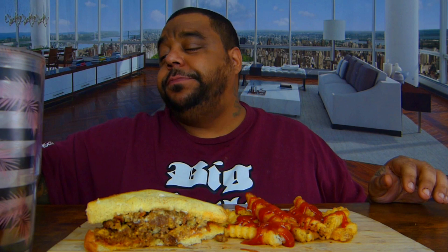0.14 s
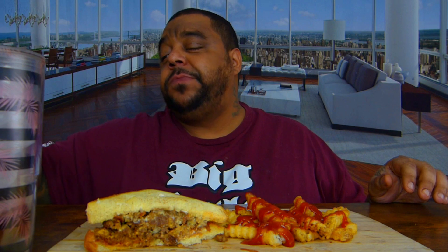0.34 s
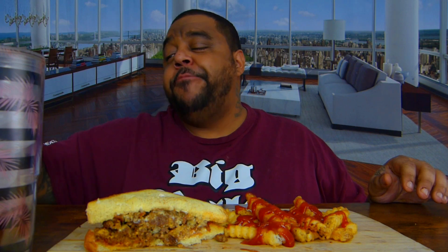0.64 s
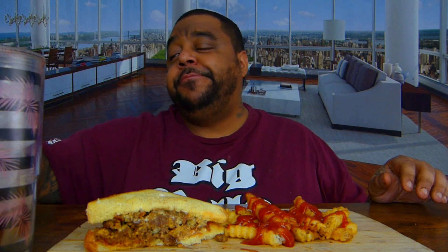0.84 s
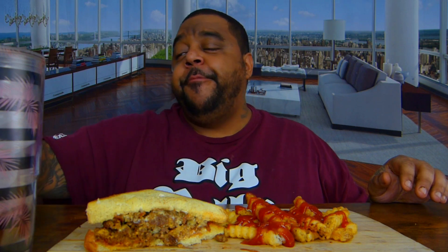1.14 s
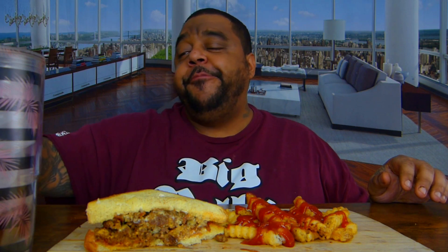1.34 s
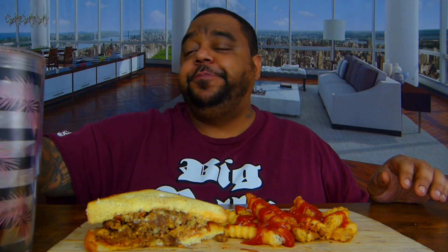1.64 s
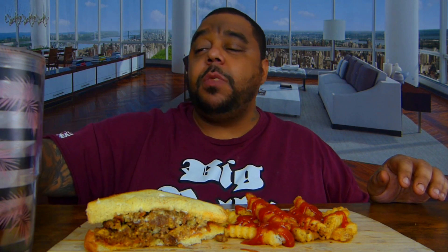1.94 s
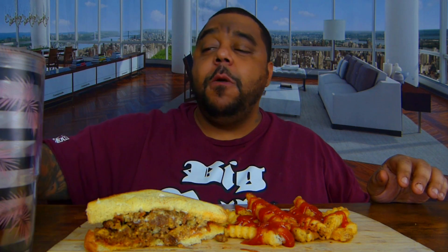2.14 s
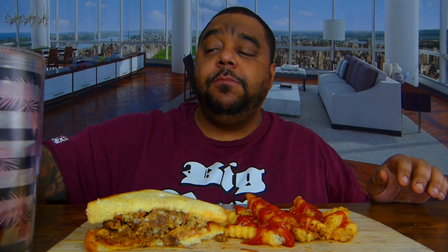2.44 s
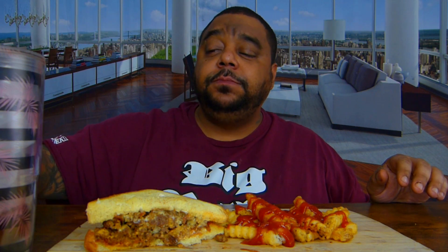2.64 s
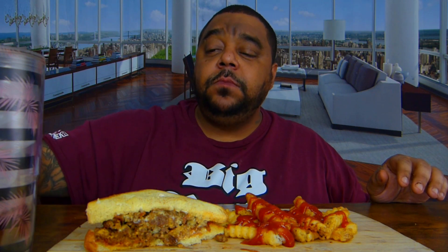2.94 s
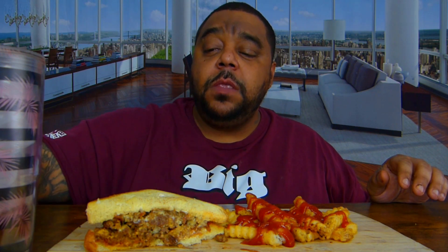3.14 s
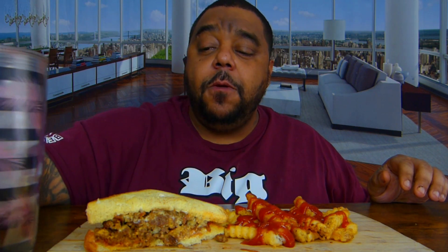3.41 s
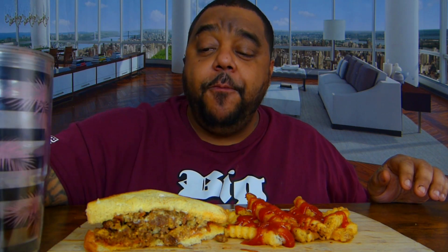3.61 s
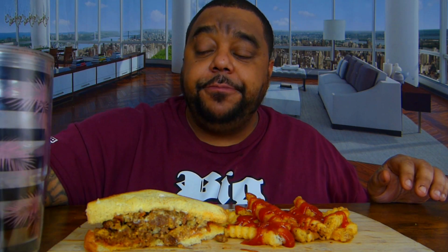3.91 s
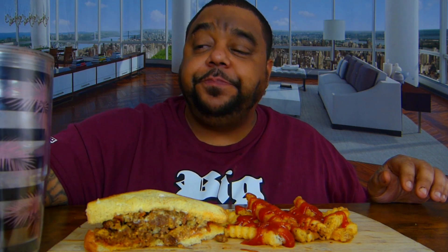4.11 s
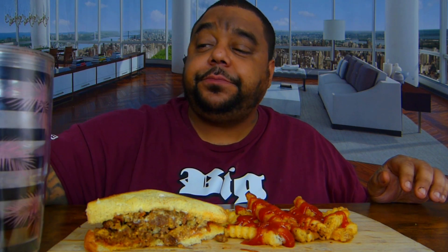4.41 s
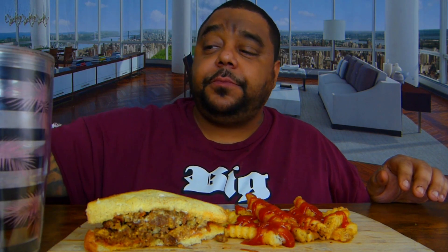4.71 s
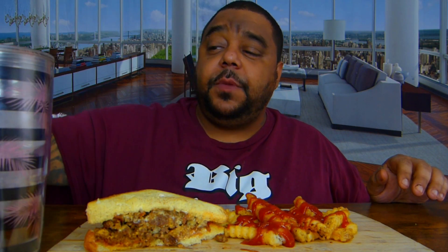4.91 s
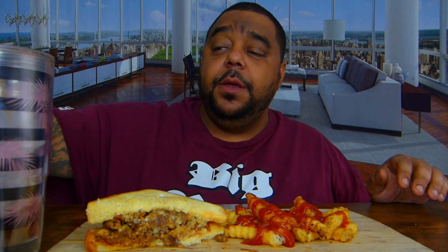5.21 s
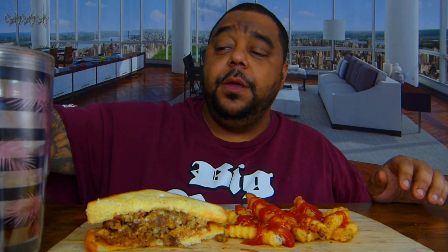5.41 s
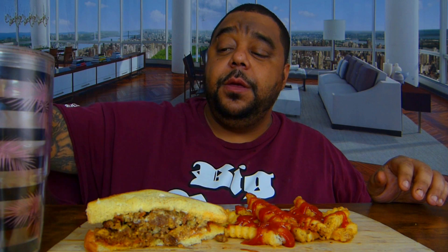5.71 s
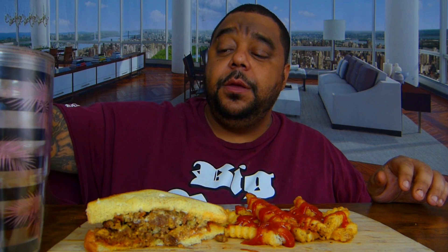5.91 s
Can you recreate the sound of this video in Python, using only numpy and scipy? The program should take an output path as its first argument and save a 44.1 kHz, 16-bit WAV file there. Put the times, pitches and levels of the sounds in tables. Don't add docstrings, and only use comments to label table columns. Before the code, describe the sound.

In a small quiet room, a full drink can is shifted lightly over a wooden table. A tiny tab tick leads to a loud metallic crack, a short burst of escaping gas and the lid tearing. The tab clicks back with a small squeak. A cup then scrapes hollowly over the wood and bumps to a stop. After a pause, soda drips, splashes and fizzes in it. The microphone is close, the can slightly to the left.

```python
import sys
import numpy as np
from scipy import signal
from scipy.fft import rfft, irfft, next_fast_len
from scipy.io import wavfile
from scipy.ndimage import uniform_filter1d, map_coordinates

SR = 44100
rng = np.random.default_rng(int(sys.argv[2]) if len(sys.argv) > 2 else 0)


def pcm_store(signal):
    levels = np.round(np.clip(np.atleast_2d(signal), -1, 1) * 32767)
    wavfile.write(sys.argv[1], SR, levels.astype(np.int16).T)


def nominal_scale(level):
    x = np.asarray(level, float) / 20
    return 10 ** x


N = 267246

# frequency in Hz, level in dB per Hz.
AIR = [(12, -35.5), (20, -14.5), (44, -32.5), (111, -15), (205, -13), (230, -14), (438, -19), (883, -14),
       (960, -18.5), (2290, -28), (3690, -43), (9060, -35.5), (12700, -42), (15000, -50), (16300, -65)]
# frequency in Hz, left-right likeness from -1 to 1.
ALIKE = [(60, 0.98), (180, 0.47), (550, -0.23), (1650, -0.31), (4970, 0.12), (15000, 0.42)]
# frequency in Hz, t60 in seconds.
ROOM_DECAY = [(200, 0.53), (1200, 0.19), (5000, 0.21), (12000, 0.17)]
# delay in seconds, level in dB.
ECHOES = [(.0013, -4.5), (.0055, -14), (.0092, -20.5), (0.0107, -19.5)]
# frequency in Hz, gain in dB.
MICROPHONE = [(20, -11.5), (120, -6), (180, 6), (250, 2), (9000, 0.5), (12000, 1), (16000, -13)]

# frequency in Hz, width in Hz, start in seconds, level in dB,
# end in seconds.
HELD_NOTES = [(505, 20, 0.545, -44, .68), (1130, 40, 0.0, -52, .07), (960, 68, 2.2, -59, 2.34),
              (880, 110, 2.34, -64, 2.43), (1326, 24, 2.865, -29.5, 2.95), (1385, 13, .155, -47, .24),
              (2260, 34, .15, -47, 0.21), (1385, 23, 0.457, -51.5, .55), (616, 25, 1.1, -50, 1),
              (947, 25, 1.1, -53.5, 1.3), (1400, 25, 0.88, -56, 1.4), (982, 40, 2.8, -34, 2.85),
              (863, 51, 2.87, -42, 2.965), (1590, 36, 2.86, -49, 2.93), (1614, 35, 3.115, -36, 3.17),
              (1400, 90, 3.22, -34, 3.32), (2900, 80, 3.0, -44, 3.2), (1566, 86, 5.172, -69, 5.66),
              (2960, 130, 5.25, -69, 5.62), (4050, 130, 5.4, -68, 5.9)]
# frequency in Hz, width in Hz, start in seconds, level in dB,
# end in seconds.
DYING_NOTES = [
    (1190, 130, 1.817, -31, 1.95),
    (2130, 140, 1.817, -47, 1.91),
    (3150, 130, 2.9, -39.5, 2.8),
    (7300, 300, 1.817, -48, 2.7),
    (313, 16.7, 3.036, -27.5, 3.14),
    (790, 67, 4.441, -48.5, 4.56),
    (4500, 500, 1.817, -43, 1.95),
    (7750, 1500, 2.163, -46, 2),
    (1450, 130, 2.7, -45, 2.6),
]

# frequency in Hz, width in Hz, level in dB.
WOOD = [(227, 51, 3), (300, 16, 5.5), (328, 69, -0.5), (420, 110, 0), (500, 40, 3), (598, 72, 0.5),
        (777, 170, -5.5)]
# frequency in Hz, width in Hz, level in dB.
VESSEL = [(866, 120, -3), (1005, 43, -1), (1095, 70, -4.5), (1190, 160, -7), (1345.5, 35, 3),
          (1400, 99, -5.5), (1506, 65, -3), (1630, 370, -5), (1615, 190, -1), (1890, 82, -14),
          (2196, 160, -5)]
# frequency in Hz, width in Hz, level in dB.
CAN_WALL = [(1416, 6.6, 5), (1865, 14, -9), (2196, 26, -3.5), (2570, 16, -2), (2750, 14, -4.5),
            (3910, 50, -5), (4670, 60, -12), (6330, 110, -6.5), (7000, 120, -8)]
# frequency in Hz, width in Hz, level in dB.
CUP_WALL = [(2830, 140, 5.5), (3200, 83, 6), (3470, 75, -8), (4010, 110, 1), (4120, 60, 3.5),
            (4750, 92, -8), (5120, 46, 2.5), (6150, 120, -6)]
# frequency in Hz, level in dB per Hz.
GRIT = [(1350, -22), (2300, -8), (2540, -11), (2860, -6), (3400, -9.5), (4140, -8), (5610, -11.5),
        (6330, -9.5), (9760, -18.5), (12500, -33.5), (16200, -70.5), (22000, -120)]
# time in seconds, speed in dB, weight in dB, note of the board under
# the base in Hz, note of the vessel in the grip in Hz.
CAN_DRAGS = [
    [(0.0, -45.5, -11.5, 699, 1095), (0.1, -51.5, 2, 373, 1080), (0.12, -46, 3, 420, 1382),
     (0.164, -37.5, -5.5, 474, 1400), (0.22, -49.5, -5, 400, 1393), (0.285, -60, 3, 273, 1280),
     (0.31, -66.5, -7, 300, 1197), (0.4, -66, -6, 307, 930)],
    [(0.4, -65, 0, 372, 1202), (0.425, -67, 2, 353, 1300), (0.445, -53, 6.5, 340, 1385),
     (0.528, -40.5, 3, 420, 1352), (0.63, -56, 15, 500, 930), (0.69, -56, 5.5, 428, 1000),
     (0.88, -61.5, 10, 300, 930), (1.052, -51.5, 10, 400.4, 1349), (1.154, -50, 8, 563, 1106),
     (1.3, -49.5, 5, 420, 960)],
]
CUP_DRAGS = [
    [(2.68, -76, -4, 330, 1190), (2.75, -58, -4, 380, 1120), (2.79, -43, 1, 392, 1040),
     (2.812, -41, 2.5, 420, 1150), (2.86, -36, -7, 420, 1120), (2.89, -26, -8.5, 443, 1160),
     (2.93, -27, -21, 400, 1320), (2.98, -41.5, -5, 378, 902.3)],
    [(2.982, -31, 1, 328, 1023), (3.018, -24, -10, 333, 1060), (3.084, -28, -5.5, 305, 1400),
     (3.176, -25.5, -13, 496, 1510), (3.27, -27, -9, 580, 1370), (3.38, -33.5, -5, 537, 1330),
     (3.49, -46, -1, 462, 1275), (3.6, -69.5, 11, 300, 1018), (3.7, -87, -9.5, 400, 1178)],
    [(3.986, -63.5, -3.5, 517, 1170), (4.038, -54, 5.5, 524, 1260), (4.138, -47.5, -2.5, 529, 1160),
     (4.27, -84, 7, 435, 1060)],
]
# time in seconds, peak in dB, vessel in dB, left over right in dB.
BUMPS = [
    (2.9815, -24, 0, 3.5),
    (3.009, -25.5, 2.5, 1),
    (3.041, -32, -27, -1),
    (4.4405, -37, -2, -3),
    (4.534, -61, 1, -4),
]

# frequency in Hz, width in Hz, level in dB.
CUP_AIR = [(580, 103, -0.5), (1500, 190, 1), (2720, 370, -8), (4020, 114, -16.5)]
# frequency in Hz, level in dB per Hz.
FIZZ = [(1650, -16.5), (2800, -14), (3680, -10.5), (4120, -8.5), (5190, -8.5), (6280, -9), (8320, -12.5),
        (11400, -26), (15000, -53)]
# start in seconds, level in dB.
SPLASHES = [
    (5.07, -67),
    (5.136, -65.5),
    (5.172, -78),
    (5.321, -61),
    (5.445, -63),
    (5.578, -62),
    (5.64, -50.5),
    (5.779, -50.5),
    (5.981, -58),
    (6.034, -61),
]
# start in seconds, peak in dB, pitch in Hz.
LARGE_BUBBLES = [(5.1727, -48, 1540), (5.3213, -45, 2720), (5.4967, -54, 1500), (5.514, -51.5, 1350),
                 (5.5336, -57, 1640), (5.5805, -61, 1530), (5.6372, -32.5, 2014), (5.6505, -35.5, 2263),
                 (5.6949, -37, 2730), (5.712, -37.5, 2620), (5.7536, -49, 1230), (5.803, -45, 1380),
                 (5.82, -44, 1615), (5.912, -45.5, 2000), (5.9982, -44, 1900), (6.0149, -41.5, 1870)]
# start in seconds, peak in dB, pitch in Hz.
SMALL_BUBBLES = [(5.0488, -64, 4520), (5.07, -52.5, 5660), (5.137, -41.5, 4670), (5.155, -43, 7000),
                 (5.155, -45, 8800), (5.2256, -51.5, 6830), (5.321, -49, 8040), (5.326, -43, 7000),
                 (5.35, -47, 4960), (5.403, -48, 6940), (5.4454, -40.5, 6700), (5.451, -47, 7000),
                 (5.471, -44, 5900), (5.5285, -45, 8120), (5.573, -46, 4700), (5.578, -35, 4270),
                 (5.586, -49, 10500), (5.594, -38, 4710), (5.629, -43, 8400), (5.649, -35, 4780),
                 (5.663, -44, 4100), (5.689, -42, 4200), (5.754, -42, 4186), (5.76, -38, 5900),
                 (5.788, -30.5, 4050), (5.80, -45, 4050), (5.8181, -43, 4730), (5.9, -49, 6500),
                 (5.918, -48, 4500), (5.946, -43, 4300), (5.977, -41, 4100), (5.9847, -36, 6440),
                 (5.999, -35, 6300), (6.0206, -36, 8300), (6.037, -31, 4850), (6.0432, -30.5, 4170),
                 (6.05, -36, 4070)]
# start in seconds, peak in dB, pitch in Hz, t60 in seconds.
FOAM_PUFFS = [(5.16, -55, 8000, .08), (5.33, -48, 6000, .08), (5.475, -52, 5800, .08),
              (5.586, -49, 10500, .06), (5.648, -41.5, 7600, .06), (5.68, -43, 6500, .07),
              (5.765, -40, 6060, 0.078), (5.80, -40.5, 8300, 0.13), (5.855, -44, 8300, .1),
              (5.90, -50, 6500, .15), (5.985, -45, 7000, .08), (6.005, -44, 9000, .08),
              (6.035, -46, 9300, .08)]
# time in seconds, peak in dB.
TICKS = [
    (5.172, -50),
    (5.3211, -41),
    (5.35, -50),
    (5.628, -46),
    (5.637, -40),
    (5.7528, -41),
    (5.819, -34),
    (6.008, -48),
]

# start in seconds, jet in dB, edge hiss over jet in dB,
# throat over jet in dB, fall in dB per second.
GUSTS = [
    (1.28, -18, 5.5, -12.5, 169.5),
    (1.462, -18, -11, -14, 198.5),
    (1.502, -19, -9, -12, 250),
    (1.529, -28, -4, 0.5, 118.5),
]
# frequency in Hz, level in dB per Hz.
JET = [(800, -95), (1760, -40), (3000, -14.5), (3510, -12), (3960, 2.5), (4540, -8), (4910, -2),
       (6570, -3.5), (6800, -2), (8840, -30), (15000, -120)]
# frequency in Hz, level in dB per Hz.
TORN_JET = [(900, -97.5), (3000, -17), (4700, -12.5), (5670, 0), (7400, -6), (8640, -4), (10400, -24.5),
            (13000, -34), (16400, -56.5)]
# frequency in Hz, level in dB per Hz.
EDGE = [(1200, -89.5), (3000, -32), (5000, -5), (6010, -7), (8160, 2.5), (11500, -11.5), (13000, -9),
        (15300, -3.5), (16400, -41)]
# frequency in Hz, level in dB per Hz.
THROAT = [(300, -78), (620, -38), (900, -6), (1110, -2.5), (1430, -2.5), (1540, -6), (1940, -8.5),
          (2500, -10), (3000, 0), (3500, -6.5), (4550, -34.5), (7700, -120)]
# frequency in Hz, width in Hz, level in dB.
SLIT = [(930, 220, -12), (1257, 200, -5.5), (1540, 190, -3.5), (1950, 300, 0), (2280, 460, -6),
        (3000, 250, -8.5)]
# frequency in Hz, width in Hz, level in dB.
HOLLOW = [(960, 110, -2), (1400, 170, -3.5), (2780, 180, -7), (4820, 210, -9)]

# ratio to its main note, width in Hz, level in dB.
CAN_BODY = [(.84, 79.4, -6.5), (1.01, 82.1, 2), (1.17, 89.3, -7.5), (1.38, 259, -13), (1.75, 221.2, -16)]
# frequency in Hz, width in Hz, level in dB.
TAB = [(3050, 240, 2), (4190, 500, 5), (4384, 43, 1), (4780, 530, 0.5), (6000, 660, -3)]
# frequency in Hz, width in Hz, level in dB.
RIM = [(7200, 130, 3), (7850, 970, 9), (10000, 1200, -8.5), (12600, 2100, -39)]
# frequency in Hz, width in Hz, level in dB.
CRACK = [(7000, 10000, 0)]
# frequency in Hz, width in Hz, level in dB.
THUD = [(400, 650, -9.5), (1150, 550, 2.5)]
# time in seconds, peak in dB, can body in dB, can body in Hz, top in dB.
LEVER_SNAPS = [
    (0.767, -63, 1, 1400, 24),
    (1.279, -1.5, -43, 2200, -6),
    (1.816, -37, -13, 1260, 2),
    (1.8165, -15, -3.5, 1195, -11.5),
    (1.9822, -43, 17, 1400, 4),
    (2.5, -24, -4, 1495, 2),
    (4.435, -45, -22, 994, 9.5),
]
# time in seconds,
# peak in dB, can body in dB, can body in Hz, top in dB.
LID_SNAPS = [(0.533, -29, -28, 1400, 0), (1.469, -21, -26.5, 1940, -1.5), (2.1597, -49, -11, 2120, 14),
             (2.167, -35, -18, 2090, 12.5), (1.4636, -5, -20.5, 1930, -9), (1.502, 0.5, -17.5, 2150, -15),
             (1.507, -8, -13, 1960, -5.5), (1.5299, -4, -6.5, 1150, 1), (1.532, -8.5, -9, 2900, -13.5),
             (2.086, -55, -20, 1190, 13), (2.162, -27.5, -17, 2220, 8.5), (2.5056, -26, -24, 1490, 4),
             (2.5092, -34, -30, 1490, 2.5)]
# frequency in Hz, width in Hz, level in dB.
CREAK = [(1170, 50, -4), (1468, 180, -4), (2120, 50, -4), (7190, 90, -8), (7800, 45, -10)]
# start in seconds, level in dB, rise in seconds, fall in dB per second,
# end in seconds.
CREAK_STROKES = [
    (1.959, -44, .006, 30, 2.04),
    (1.984, -36.5, 0.0033, 258, 1.76),
    (2.003, -40.5, 0.0031, 302, 1.7),
]


def unit(x):
    return x / np.sqrt(np.mean(x ** 2) + 1e-20)


def along(points, hz):
    f, value = np.transpose(points)
    return np.interp(np.log(hz + 1), np.log(f + 1), value)


def curves(*tables):
    t = np.arange(N) / SR
    out = np.full((len(tables[0][0]) - 1, N), -140.)
    for table in tables:
        times, *columns = np.transpose(table)
        inside = (t >= times[0]) & (t <= times[-1])
        out[:, inside] = [np.interp(t[inside], times, column) for column in columns]
    return out


def wobble(rate):
    knots = rng.standard_normal(int(N * rate / SR) + 4)
    return map_coordinates(knots, [np.arange(N) * rate / SR])


def filtered(x, response):
    size = next_fast_len(N + SR // 2)
    return irfft(rfft(x, size) * response(np.fft.rfftfreq(size, 1 / SR)), size)[..., :N]


def coloured(x, spectrum):
    return unit(filtered(x, lambda hz: nominal_scale(along(spectrum, hz))))


def ringing(x, modes):
    rows = []
    for k, (hz, width, db) in enumerate(modes):
        b, a = signal.iirpeak(hz, hz / max(width, 5), SR)
        rows.append(nominal_scale(db) * (-1) ** k * signal.lfilter(b, a, x))
    return np.array(rows)


def resonant(x, modes):
    return unit(ringing(x, modes).sum(0))


def twice_ringing(x, hz, width, second_width):
    return ringing(ringing(x, [(hz, width, 0)])[0], [(hz, second_width, 0)])[0]


def grains(rough_db, rate):
    return unit(rng.standard_normal(N) * nominal_scale(rough_db * wobble(rate)))


def patchy(x, depth_db):
    z = signal.stft(x, nperseg=256)[2]
    field = uniform_filter1d(rng.standard_normal(z.shape), 5, 0)
    field = unit(uniform_filter1d(field, 7, 1))
    return unit(signal.istft(z * nominal_scale(depth_db * field), nperseg=256)[1][:N])


def burst(s, db, rise_s, fall_db, until_s=np.inf):
    t = np.arange(N) / SR - s
    on = (t > 0) & (t < until_s - s)
    out = np.zeros(N)
    out[on] = nominal_scale(db - fall_db * t[on]) * (1 - np.exp(-t[on] / rise_s)) ** 2
    return out


def panned(x, db):
    return x * nominal_scale(np.reshape([db / 2, -db / 2], (2, -1)))


def add(out, s, sound):
    seat = out[:, round(s * SR):][:, :sound.shape[1]]
    seat += sound[:, :seat.shape[1]]


def struck(parts, t60, length=SR // 8, hard=2.4):
    rise_s = .0004
    t = np.arange(length) / SR
    blow = rng.standard_normal(length) * nominal_scale(-60 * t / t60)
    blow[round(rise_s * SR)] += hard
    blow *= np.clip((t + 1 / SR) / rise_s, 0, 1)
    out = 0
    for modes, db in parts:
        ring = nominal_scale(rng.normal(0, 0.32, len(modes))) @ ringing(blow, modes)
        low = modes[0][0] - 2 * modes[0][1]
        high = modes[-1][0] + 2 * modes[-1][1]
        edges = np.clip([low, high], 120, 19000)
        ring = signal.lfilter(*signal.butter(1, edges, "band", fs=SR), ring)
        out = out + nominal_scale(db) * ring / np.abs(ring).max()
    return out


def air():
    def angle(hz):
        return np.arccos(np.clip(along(ALIKE, hz), -1, 1)) / 2

    def shares(hz):
        return nominal_scale(along(AIR, hz)) * [np.cos(angle(hz)), np.sin(angle(hz))]

    mid, side = filtered(rng.standard_normal((2, N)), shares)
    return unit(np.array([mid + side, mid - side])) * nominal_scale(-59.5 + .6 * wobble(6.7))


def room(x, tails):
    out = np.zeros((2, N + SR))
    x = signal.lfilter(*signal.butter(2, 436, "high", fs=SR), x)
    edges = np.linspace(0, N, tails + 1).astype(int)
    for a, b in zip(edges, edges[1:]):
        hz, t, z = signal.stft(rng.standard_normal((2, SR // 2)), SR, nperseg=256)
        decay = nominal_scale(-60 * t / along(ROOM_DECAY, hz)[:, None])
        tail = signal.istft(z * decay, SR, nperseg=256)[1]
        wet = signal.fftconvolve(x[None, a:b], tail / np.linalg.norm(tail[0]), axes=1)
        out[:, a + 300:][:, :wet.shape[1]] += wet
    return out[:, :N]


def ducked(loud):
    lag_s, hold_s, from_db, slope = .03, .014, -29, 2.2
    keep = np.exp(-1 / SR / hold_s)
    power = signal.lfilter([1 - keep], [1, -keep], loud.mean(0) ** 2)
    level_db = 10 * np.log10(np.roll(power, round(lag_s * SR)) + 1e-12)
    return nominal_scale(-slope * np.clip(level_db - from_db, 0, None))


def held():
    steady = .6
    out = np.zeros((1, N))
    notes = [(4.5, *row) for row in HELD_NOTES] + [(170, *row) for row in DYING_NOTES]
    for fall_db, hz, width, s, db, end in notes:
        note = twice_ringing(rng.standard_normal(SR), hz, width, 3.0 * width)
        note = unit(note / np.abs(signal.hilbert(note)) ** steady)[SR // 4:]
        t = np.arange(len(note)) / SR
        onset = 1 - np.exp(-t * fall_db ** .5 / .02)
        ending = np.clip((end - s - t) / .015, 0, 1)
        add(out, s, (note * onset * ending * nominal_scale(db - fall_db * t))[None])
    return panned(out[0] * nominal_scale(1.6 * wobble(20)), 1.4)


def pressed(force, modes, centre_hz, reach):
    mode_hz = np.array(modes)[:, :1]
    near = np.exp(-(np.log(mode_hz / np.clip(centre_hz, 100, None)) / reach) ** 2)
    weights = (near + 0.48) / np.linalg.norm(near + 0.3, axis=0)
    return unit((ringing(force, modes) * weights).sum(0))


def drags():
    vessel_db, weight_db, wood_hz, vessel_hz = np.maximum(curves(*CAN_DRAGS), curves(*CUP_DRAGS))
    cup = np.arange(N) / SR > CAN_DRAGS[-1][-1][0]
    usual_db = np.where(cup, -40, -51)
    grit_over_db = np.where(cup, -8, -1)
    bite = np.where(cup, 0.11, 0.2955)
    weight_db = np.clip(weight_db, -30, 30)
    wood_db = vessel_db + weight_db
    grit_db = usual_db + grit_over_db + 0.95 * (vessel_db - usual_db) + bite * weight_db

    force = grains(rough_db=-1.5, rate=140)
    wood = pressed(force, WOOD, wood_hz, reach=0.47) * nominal_scale(wood_db + 1.3 * wobble(25.02))
    vessel = pressed(force, VESSEL, vessel_hz, reach=0.36) * nominal_scale(vessel_db + 1.0 * wobble(25))
    grit = patchy(coloured(grains(rough_db=0.5, rate=300), GRIT), depth_db=2.0)
    grit = grit * nominal_scale(grit_db + 0.9 * wobble(30))
    walls = np.where(cup, resonant(force, CUP_WALL), resonant(force, CAN_WALL)) * nominal_scale(grit_db - 5.0)
    rub = wood + vessel + grit + walls
    dull = filtered(rub, lambda hz: 1 / (1 + (hz / 10400) ** 12))
    return panned(np.where(cup, dull, rub), np.where(cup, 3, -0.5))


def bumps():
    out = np.zeros((2, N))
    for s, db, vessel_db, pan_db in BUMPS:
        knock = struck([(WOOD, db), (VESSEL[:3], db + vessel_db)], t60=0.032)
        add(out, s, panned(knock, pan_db))
    return out


def bubble(hz, t60, wet):
    t = np.arange(SR // 12) / SR
    shake = 1 + wet * unit(uniform_filter1d(rng.standard_normal(len(t)), 90))
    tone = np.sin(2 * np.pi * hz * t * (.98 + 0.48 * t))
    return shake * tone * (1 - np.exp(-t / 0.0032)) * nominal_scale(-60 * t / np.clip(t60, .003, .08))


def pour():
    pan_db = 2
    fizz = burst(5, -58, rise_s=0.35, fall_db=-3)
    for s, db in SPLASHES:
        fizz = fizz + burst(s, db, rise_s=0.0083, fall_db=120.5)
    swarm = patchy(coloured(grains(rough_db=3.0, rate=710), FIZZ), depth_db=3.0) * fizz
    late = np.arange(N) / SR - 5.54
    stream_db = -54.5 + np.minimum(60 * late, -45 * late)
    stream = resonant(grains(rough_db=1.5, rate=100), CUP_AIR) * nominal_scale(stream_db)
    out = panned(swarm + stream, 0.35)

    for s, db, hz in LARGE_BUBBLES + SMALL_BUBBLES:
        t60 = 0.052 * (hz / 1000) ** -0.41
        add(out, s, panned(nominal_scale(db) * bubble(hz, t60, wet=0.71), pan_db))
        splash = [([(hz, 0.18 * hz, 0)], db - 3.5), (CRACK, db - 13)]
        add(out, s, panned(struck(splash, t60=.008, length=SR // 100), pan_db))
    for s, db, hz, t60 in FOAM_PUFFS:
        cloud = [([(hz, 0.14 * hz, 0)], db)]
        add(out, s, panned(struck(cloud, t60=t60, length=SR // 10, hard=0), pan_db))
    for s, db in TICKS:
        add(out, s, panned(struck([(CRACK, db)], t60=.003, length=SR // 100), pan_db))
    for when, pitch, size, side in rng.random((150, 4)):
        s = 5.32 + .73 * when
        hz = 3500 * 2.7 ** pitch
        level = fizz[round(s * SR)] * nominal_scale(2.5 - 3 * np.log(size))
        add(out, s, panned(level * bubble(hz, 90 / hz, wet=.4), 8 * side - 4))
    return out


def settling_foam():
    start_s = 1.8
    foam = patchy(coloured(grains(rough_db=2.0, rate=230), FIZZ), depth_db=-1.5)
    foam = foam * burst(start_s, -53, rise_s=0.008, fall_db=6)
    hollow = burst(start_s, -48, rise_s=0.0038, fall_db=28.5) + burst(start_s, -76.5, rise_s=.03, fall_db=0)
    return foam + resonant(grains(rough_db=2.5, rate=24), HOLLOW) * hollow


def gas():
    seal_rise_s, tear_rise_s = 0.0055, .003
    jet_gain, edge_gain, throat_gain = [], 0, []
    ends = [row[0] for row in GUSTS[1:]] + [np.inf]
    for k, ((s, db, edge_db, throat_db, fall_db), end) in enumerate(zip(GUSTS, ends)):
        rise_s = tear_rise_s if k else seal_rise_s
        throat_s = s if k else s + 0.053
        throat_fall_db = 0.99 * fall_db if k else 201.5
        jet_gain.append(burst(s, db, rise_s, fall_db, end))
        edge_gain = edge_gain + burst(s, db + edge_db, rise_s, 1.22 * fall_db, end)
        throat_gain.append(burst(throat_s, db + throat_db, tear_rise_s, throat_fall_db, end))

    jet = coloured(grains(rough_db=-3.5, rate=200), JET) * (jet_gain[0] + jet_gain[-1])
    jet += coloured(grains(rough_db=6.0, rate=230), TORN_JET) * sum(jet_gain[1:-1])
    hisses = [coloured(grains(rough_db=-2.0, rate=750), EDGE) for _ in range(2)]
    edge = np.array([[.9, .42], [1.0, -0.46]]) @ hisses * edge_gain

    throat = coloured(grains(rough_db=-1.0, rate=460), THROAT) * throat_gain[-1]
    slit = ringing(grains(rough_db=1.5, rate=120), SLIT).sum(0)
    slit = unit(filtered(slit, lambda hz: 1 / (1 + (720 / (hz + 1)) ** 6)))
    leak = burst(GUSTS[0][0], -46, seal_rise_s, 33, GUSTS[1][0])
    throat += slit * (sum(throat_gain[:-1]) + leak)

    seep = ringing(rng.standard_normal(N), [(6900, 690, 0)])[0]
    seep = unit(ringing(seep, [(6860, 1200, 0)])[0])
    seep = seep * burst(.63, -58, rise_s=0.01, fall_db=2.5, until_s=1.25) * nominal_scale(2.2 * wobble(11))
    return panned(jet + throat, 1.9) + edge + seep


def creak():
    rub = resonant(grains(rough_db=3, rate=150), CREAK)
    return panned(rub * sum(burst(*row) for row in CREAK_STROKES), 2.5)


def snaps():
    out = np.zeros((2, N))
    # where the bend rings most in Hz, jolt over the can body in dB
    events = [(4170, -19, *row) for row in LEVER_SNAPS] + [(5200, -6.5, *row) for row in LID_SNAPS]
    for tab_hz, thud_db, s, db, can_db, can_hz, top_db in events:
        tab = [(hz, width, level - 30 * abs(np.log(hz / tab_hz))) for hz, width, level in TAB]
        can = [(ratio * can_hz, width, level) for ratio, width, level in CAN_BODY]
        parts = [(tab, db), (can, db + can_db), (RIM, db + top_db),
                 (CRACK, db + min(top_db, 0)), (THUD, db + min(can_db, 0) + thud_db)]
        hit = struck(parts, t60=0.0037)
        add(out, s, panned(hit, 2.7))
        push = np.arange(SR // 20) / SR / 0.0012
        add(out, s, panned(nominal_scale(db - 31.0 + 0.7 * thud_db) * push * np.exp(1 - push), 1.5))
        for delay, echo_db in ECHOES:
            gain = nominal_scale(echo_db + rng.normal(0, 1.4, (2, 1))) * rng.choice([-1, 1])
            add(out, s + delay, hit * gain)
    return out


def scene():
    knocks = snaps() + bumps()
    sharp = signal.lfilter(*signal.butter(2, 13000, fs=SR), knocks) + creak()
    hiss = gas() + settling_foam() + pour()
    rub = drags() + held()
    duck = ducked(sharp + hiss)
    side = nominal_scale([[1.2], [-1.2]])
    can_room = room(nominal_scale(-5.5) * hiss.mean(0) + nominal_scale(-3.5) * sharp.mean(0), tails=12)
    can = nominal_scale(-1.0) * hiss + sharp + side * can_room
    table = nominal_scale(-2.5) * rub + side * room(nominal_scale(-5.5) * rub.mean(0), tails=8)
    heard = filtered(can + table * duck, lambda hz: nominal_scale(along(MICROPHONE, hz)))
    return heard + air() * duck


def top_cut(x):
    return signal.sosfilt(signal.butter(12, 16480, fs=SR, output="sos"), x)


def record(dry):
    x = dry - .0026
    x = x / (1 + np.abs(x) ** 6) ** (1 / 6)
    return top_cut(x)


dry = scene()
out = record(dry)
pcm_store(out)
```